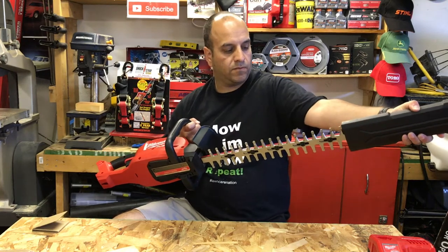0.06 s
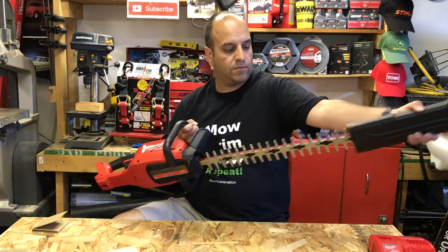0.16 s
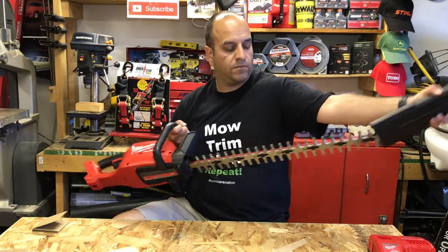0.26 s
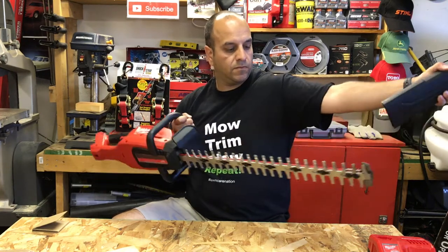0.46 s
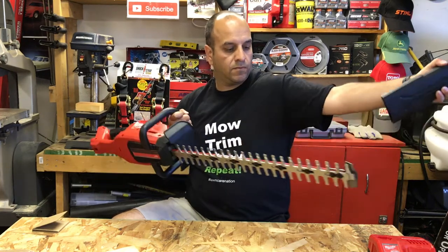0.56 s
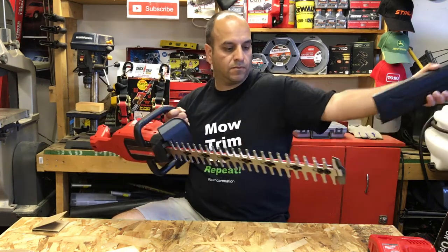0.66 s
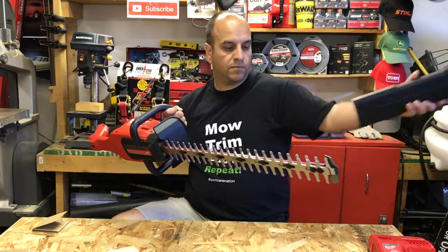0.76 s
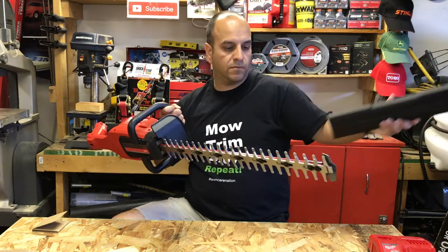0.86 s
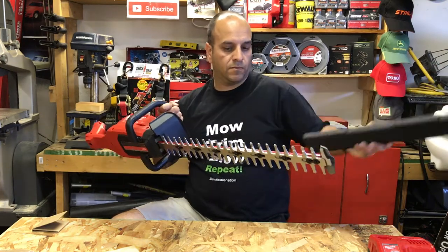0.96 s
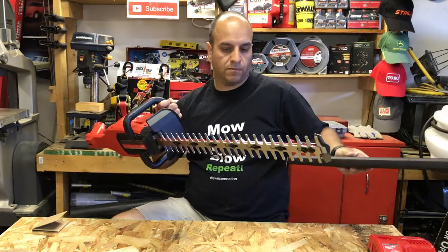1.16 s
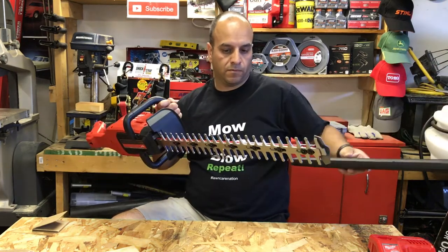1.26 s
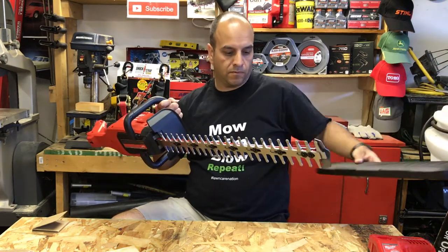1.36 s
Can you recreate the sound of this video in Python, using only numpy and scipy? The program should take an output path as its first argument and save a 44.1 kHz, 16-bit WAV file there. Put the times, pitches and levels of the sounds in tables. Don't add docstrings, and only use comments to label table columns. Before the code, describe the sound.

Toothed metal blades scrape and crack out of a hollow plastic cover, followed by soft rubs and knocks.

```python
import sys
import numpy as np
from scipy import signal
from scipy.fft import rfft, irfft
from scipy.io import wavfile
from scipy.ndimage import uniform_filter1d

SR = 44100
rng = np.random.default_rng(int(sys.argv[2]) if len(sys.argv) > 2 else 0)


def to_linear_factor(level_db):
    exponent = np.asarray(level_db, float) / 20
    return 10 ** exponent


def file_out(sig):
    cols = np.atleast_2d(sig).T
    lim = np.clip(cols, -1, 1)
    pcm = np.round(lim * 32767).astype(np.int16)
    wavfile.write(sys.argv[1], SR, pcm)


N = 61739
CRACK_LEAD = 200


def evened(x):
    return x / np.sqrt(np.mean(x ** 2) + 1e-20)


def read(points, hz):
    f, value = np.transpose(points)
    return np.interp(np.log(hz + 1), np.log(f + 1), value, left=value[0] - 20)


def colour(x, points):
    gain = to_linear_factor(read(points, np.fft.rfftfreq(len(x), 1 / SR)))
    return irfft(rfft(x) * evened(gain), len(x))


def curve(points, axis):
    p = np.array(points, float)
    return to_linear_factor(np.interp(np.arange(N) / SR, p[:, 0], p[:, axis], left=-200, right=-200))


def add(mix, s, sound):
    part = mix[round(s * SR):][:len(sound)]
    part += sound[:len(part)]


SHELL_MODE_HZ = [270, 350, 400, 445, 492, 540, 586, 745, 930, 1010, 1285, 1570, 1860, 2300]
# (level [dB], t60 [s])
SHELL_MODES = [(0.5, 0.035), (-1, 0.077), (3.5, 0.032), (-4.5, 0.13), (-4.5, 0.049), (1.5, 0.042),
               (-8.5, 0.084), (-3.5, 0.077), (-3, 0.021), (-0.5, 0.029), (-2, 0.041), (-5.5, 0.097),
               (-2.5, 0.03), (3.5, 0.047)]


def ring(zone_hz, damping, free=9):
    t = np.arange(9000) / SR
    hz, db, t60 = np.c_[SHELL_MODE_HZ, SHELL_MODES].T[:, :, None]
    uneven_db = rng.standard_normal((len(hz), 1))
    zone_db = -13.5 * abs(np.log2(hz / zone_hz))
    choke_db = -6 * np.clip((t - free) / 0.0019, 0, 1) * (hz < 1150)
    fade = to_linear_factor(db + uneven_db + zone_db + choke_db - 60 * damping * t / t60)
    sign = (-1.) ** np.arange(len(hz))[:, None]
    h = (fade * sign * np.sin(2 * np.pi * hz * t)).sum(0)
    h = h * (1 - np.exp(-t / 0.00024))
    return h / np.linalg.norm(h)


# (frequency [Hz], level [dB per Hz])
CRACK_SPECTRUM = [(700, -10.5), (1500, -5.5), (3000, -4.5), (5200, -3), (8500, -14), (12000, -24.5),
                  (16000, -45.5)]


def crack(db, length):
    t = np.arange(3000) / SR
    burst = rng.standard_normal(len(t)) * np.exp(-t / length) * np.minimum(t / 0.00032, 1)
    return to_linear_factor(db) * colour(np.r_[np.zeros(CRACK_LEAD), burst], CRACK_SPECTRUM) / 3


# (time [s], crack level [dB], crack length [s], shell level [dB], struck zone [Hz])
CATCHES = [(0.1788, -32, 0.0045, -54, 1100), (0.198, -18.5, 0.0014, -55, 700),
           (0.2016, -29.5, 0.003, -38.5, 760), (0.2087, -34.5, 0.0041, -38, 347),
           (0.221, -25.5, 0.0036, -32.5, 1000), (0.2305, -13, 0.0045, -41.5, 526),
           (0.239, -20, 0.0026, -35.5, 540), (0.2664, -5.5, .0014, -30.5, 960),
           (0.27, -15.5, 0.0092, -33.5, 392), (0.283, -21.5, 0.002, -38, 950),
           (0.2861, -15, 0.0025, -32.5, 760), (0.2898, -26, 0.0031, -35.5, 482),
           (0.318, -22, 0.0074, -41, 498), (.328, -21, 0.0029, -40.5, 436), (0.342, -27, 0.0046, -63, 744),
           (0.71, -47, .001, -85, 900), (0.7252, -50.5, 0.024, -57.5, 1195), (.776, -43, 0.0047, -61, 740)]


def tooth_catches():
    out = np.zeros(N)
    for s, crack_db, length, shell_db, zone_hz in CATCHES:
        add(out, s - CRACK_LEAD / SR, crack(crack_db, length))
        add(out, s, to_linear_factor(shell_db) * 30 * ring(zone_hz, damping=0.86))
    return out


def grit():
    grains_per_s, spread_db = 12000, 2.5
    size = to_linear_factor(spread_db * np.minimum(rng.exponential(1, N), 3)) * rng.standard_normal(N)
    return evened(size * (rng.random(N) < grains_per_s / SR))


def slide(points, spectrum, zone_hz, grip):
    shake = signal.oaconvolve(grit() * curve(points, axis=2), ring(zone_hz, grip))[:N]
    z = signal.stft(grit(), nperseg=128, noverlap=96)[2]
    patches = uniform_filter1d(rng.standard_normal(z.shape), size=3, axis=0)
    patches = evened(uniform_filter1d(patches, size=10, axis=1))
    patchy = z * to_linear_factor(2.1 * patches)
    hiss = evened(signal.istft(patchy, nperseg=128, noverlap=96)[1][:N])
    return colour(hiss * curve(points, axis=1), spectrum) + shake


# (frequency [Hz], level [dB per Hz])
STEEL_SPECTRUM = [(710, -13), (1200, -5), (1400, -11), (1560, -8.5), (1830, -4.5), (2300, -13),
                  (5180, -12.5), (11800, -29.5), (16000, -49.5)]
# (time [s], hiss level [dB], shell level [dB])
DRAG = [
    (.15, -65, -78),
    (.176, -51.5, -55.5),
    (.195, -47, -43.5),
    (.205, -31, -32),
    (.24, -31, -35),
    (.26, -33.5, -32.5),
    (.29, -31, -34.5),
    (.334, -35.5, -36),
    (.345, -67.5, -82),
]
# (time [s], hiss level [dB], shell level [dB])
FIDGET = [
    (0, -77, -69.5),
    (.04, -73.5, -66.5),
    (.065, -62, -80),
    (.09, -70.5, -70),
    (.115, -70.5, -61),
    (.135, -66.5, -59.5),
    (.16, -67.5, -65),
]


def blade_slides():
    return slide(DRAG, STEEL_SPECTRUM, 620, 1.17) + slide(FIDGET, STEEL_SPECTRUM, 650, 0.6)


SQUEAK_S = [.047, .063, .118, .128, .176, .2175, .2245, .281, .314, .316, .316, .774, .79, .957, 1.378,
            .196, .208, 1.322]
SQUEAK_HZ = [1030, 520, 2400, 1050, 4600, 3200, 4700, 5200, 5550, 10800, 2500, 4200, 2800, 5300, 3600, 370,
             1010, 800]
# (length [s], level [dB], blur [Hz])
SQUEAKS = [(0.019, -60.5, 24), (0.0089, -52, 17), (0.021, -63.5, 26), (.028, -53.5, 40), (0.0072, -51, 360),
           (0.0092, -27.5, 210), (0.014, -31.5, 800), (0.013, -26.5, 620), (.016, -37, 200),
           (0.0044, -40, 1200), (0.013, -30.5, 500), (0.014, -55, 900), (0.2, -75, 42), (0.0089, -54, 880),
           (0.005, -50, 900), (0.075, -32, 30), (0.044, -38, 44), (0.025, -70, 50)]


def swell(length, hz, db, blur_hz=2):
    t = np.arange(0, length, 1 / SR)
    wander = uniform_filter1d(rng.standard_normal((2, 30000)), size=int(SR / (2 * blur_hz)))
    a, b = wander[:, 9000:9000 + len(t)]
    tone = evened(a * np.sin(2 * np.pi * hz * t) + b * np.cos(2 * np.pi * hz * t))
    return to_linear_factor(db - 1.0) * np.sin(np.pi * t / length) * tone


def squeaks():
    out = np.zeros(N)
    for s, hz, (length, db, blur_hz) in zip(SQUEAK_S, SQUEAK_HZ, SQUEAKS):
        add(out, s, swell(length, hz, db, blur_hz))
    return out


# (time [s], frequency [Hz], level [dB], t60 [s], free ring [s])
THUDS = [(.9565, 542, -32.5, 0.38, 0.011), (0.96, 402, -41, 0.17, 0.016), (.9565, 1270, -44, 0.17, 0.05),
         (.9562, 1780, -43.5, 0.023, .02), (.9562, 810, -44.5, 0.071, 0.025),
         (0.98, 1570, -46, 0.069, 0.042),
         (0.97, 440, -41.5, 0.33, 0.0247)  , (.9685, 293, -50, 0.089, 0.017),
         (.233, 525, -18.5, 0.1, 0.015), (.268, 512, -24, 0.17, 0.012), (0.29, 484, -18, 0.16, 0.027),
         (.319, 505, -20, 0.15, .024), (.203, 406, -25, 0.089, 0.017), (.229, 367, -22.5, 0.12, .024),
         (.204, 770, -30, 0.18, 0.016), (.21, 1040, -25.5, 0.11, 0.014), (.28, 726, -23, 0.16, 0.014),
         (0.723, 1230, -62, .15, 0.0025), (.731, 1180, -52.5, .1, 0.0053), (1.324, 780, -49.5, .3, 0.016),
         (1.339, 570, -54, 0.083, .008), (1.356, 740, -48.5, .1, 0.0078), (1.3635, 566, -44, .1, .004),
         (1.369, 480, -42, 0.12, .006), (1.3795, 740, -42, 0.41, .022), (1.3795, 1360, -48, .2, .022),
         (1.386, 560, -48.5, 0.18, .015), (1.392, 697, -43.5, .3, .012), (1.393, 1050, -45, .3, .012),
         (1.5, 2000, -52.5, 0.27, .022), (.2, 62, -46, .4, .09), (.272, 290, -30.5, 0.1, .03),
         (.27, 160, -38.5, .15, 0.0285), (.775, 276, -59, 0.078, 0.022)]


def thuds():
    out, t = np.zeros(N), np.arange(SR // 4) / SR
    choke_db_per_s, rise_s = -9000, 0.00066
    for s, hz, db, t60, free in THUDS:
        fade = to_linear_factor(db - 60 * t / t60 + choke_db_per_s * np.maximum(t - free, 0))
        add(out, s, fade * np.minimum(t / rise_s, 1) * np.sin(2 * np.pi * hz * t))
    return out


# (time [s], level [dB])
PUMP = [
    (.165, -87.5),
    (.19, -28.5),
    (.24, -39),
    (.27, -21),
    (.29, -48),
    (.31, -60),
]


def air_column():
    column_hz, t60, leftover_db = 103.2, 0.85, -53
    t, r = np.arange(N) / SR, to_linear_factor(-60 / t60 / SR)
    pumped = signal.lfilter([(1 - r) * 4], [1, -r], curve(PUMP, axis=1))
    leftover = to_linear_factor(leftover_db - 60 * t / t60)
    return (pumped + leftover) * np.cos(2 * np.pi * column_hz * (t - 0.78))


# (frequency [Hz], level [dB], t60 [s])
OVERTONES = [
    (444, -23.5, 0.26),
    (551, -39, .2),
]


def sheath_overtones():
    t = np.maximum(np.arange(N) / SR - .298, 0)
    out = np.zeros(N)
    for hz, db, t60 in OVERTONES:
        out += to_linear_factor(db - 60 * t / t60) * np.minimum(t / 0.012, 1) * np.sin(2 * np.pi * hz * t)
    return out


# (frequency [Hz], level [dB per Hz])
SKIN_SPECTRUM = [(590, -34.5), (1000, -12.5), (1790, -12), (2870, -10), (3980, -11), (5440, -10),
                 (11700, -23), (16000, -31)]
# (time [s], hiss level [dB], shell level [dB])
RUB = [
    (.755, -70, -74),
    (.775, -53.5, -55.5),
    (.81, -60, -62.5),
    (.86, -61, -63),
    (.9, -56.5, -58),
    (.94, -65.5, -59.5),
    (1.03, -62.5, -61.5),
    (1.07, -66, -59.5),
    (1.1, -79, -79.5),
]
# (time [s], hiss level [dB], shell level [dB])
SETTLE = [
    (1.29, -82, -86),
    (1.33, -64, -56.5),
    (1.35, -60, -57),
    (1.41, -66.5, -50),
]


def hand_rubs():
    return slide(RUB, SKIN_SPECTRUM, 575, 1.26) + slide(SETTLE, SKIN_SPECTRUM, 710, 1.8)


# (time [s], crack level [dB], shell level [dB], struck zone [Hz], free ring [s])
KNOCKS = [
    (0.9563, -46, -49.5, 914, 0.011),
    (1.195, -80, -65, 624, 0.053),
    (1.325, -74, -67.5, 765, 0.011),
    (1.34, -74.5, -58.5, 607, 0.0055),
    (1.3795, -47, -56.5, 1040, 0.0034),
    (1.39, -44.5, -54.5, 1320, 0.025),
]


def wood_knocks():
    out = np.zeros(N)
    for s, crack_db, shell_db, zone_hz, free in KNOCKS:
        add(out, s - CRACK_LEAD / SR, crack(crack_db, 0.0086))
        add(out, s, to_linear_factor(shell_db) * 30 * ring(zone_hz, 0.51, free))
    add(out, 1.3, swell(length=0.099, hz=55.7, db=-63))
    return out


# (frequency [Hz], t60 [s])
GARAGE_DECAY = [(200, 0.46), (530, 0.35), (1390, 0.44), (3680, 0.44), (9700, .33)]
# (frequency [Hz], level [dB])
WALLS = [(200, -10.5), (600, -1), (2000, -7), (6000, -3.5), (14000, -5)]


def garage(x):
    taps = np.zeros(SR // 2)
    at = np.arange(300, len(taps) - 12, 12)
    taps[at + rng.integers(0, 12, len(at))] = rng.choice([-1., 1.], len(at))
    hz, t, z = signal.stft(taps, SR, nperseg=256)
    t60 = read(GARAGE_DECAY, np.maximum(hz, GARAGE_DECAY[0][0]))[:, None]
    tail = signal.istft(z * to_linear_factor(-60 * t / t60), SR, nperseg=256)[1]
    return signal.fftconvolve(colour(x, WALLS), tail / np.linalg.norm(tail))[:N]


# (frequency [Hz], level [dB per Hz])
FLOOR_SPECTRUM = [(12, -29.5), (20, -6.5), (55, -5), (81, -8), (388, -19), (434, -17.5), (849, -29.5),
                  (1000, -28.5), (16000, -43)]


def floor_noise():
    return to_linear_factor(-62) * colour(rng.standard_normal(N), FLOOR_SPECTRUM)


def scene():
    near = tooth_catches() + blade_slides() + squeaks() + hand_rubs() + wood_knocks()
    modes = thuds()
    room = to_linear_factor(-9.5) * garage(near + to_linear_factor(-6) * modes)
    return (near + modes + air_column() + sheath_overtones() + room + floor_noise())[None]


def roll_off(x):
    return signal.sosfilt(signal.butter(12, 16610, fs=SR, output="sos"), x)


def record(dry):
    low_pass = signal.firwin(255, 15800, fs=SR)[None]
    mix = signal.oaconvolve(dry, low_pass, "same")
    return roll_off(mix)


dry = scene()
out = record(dry)
file_out(out)
```